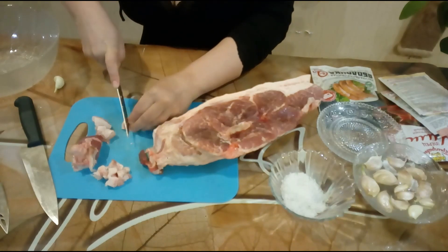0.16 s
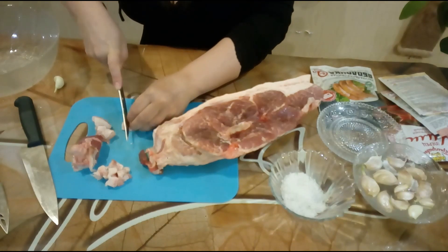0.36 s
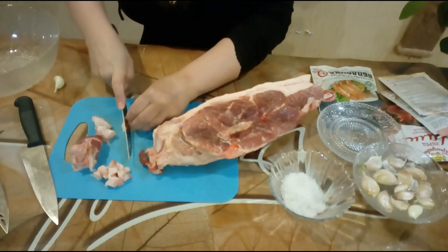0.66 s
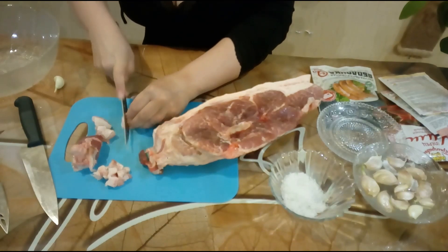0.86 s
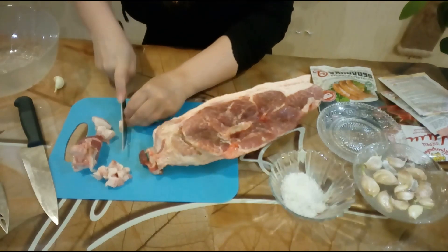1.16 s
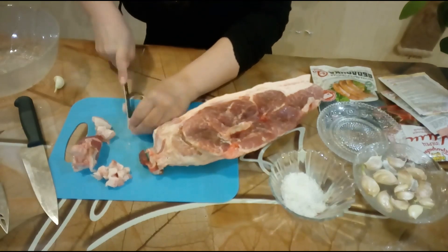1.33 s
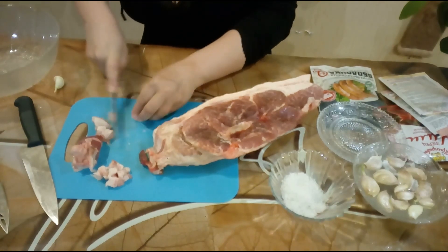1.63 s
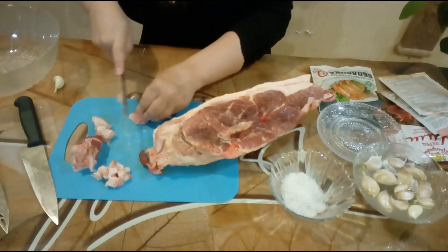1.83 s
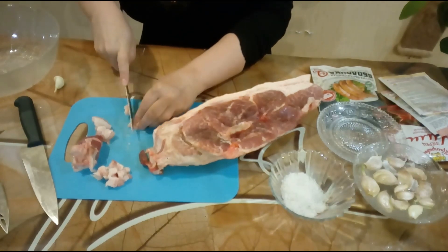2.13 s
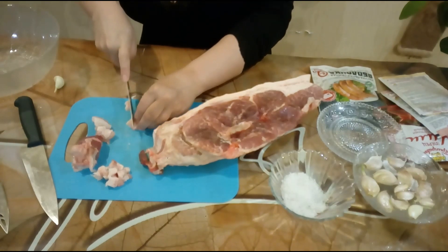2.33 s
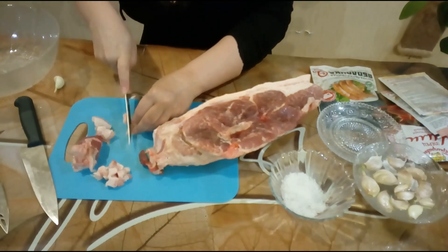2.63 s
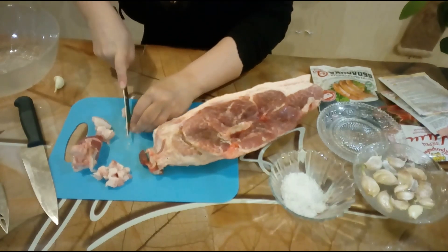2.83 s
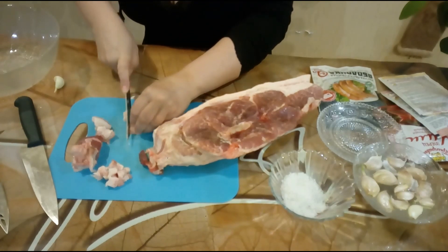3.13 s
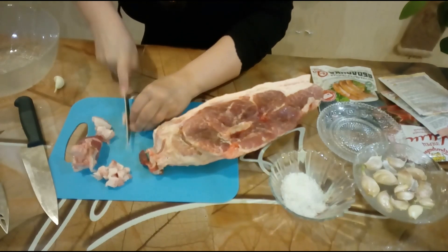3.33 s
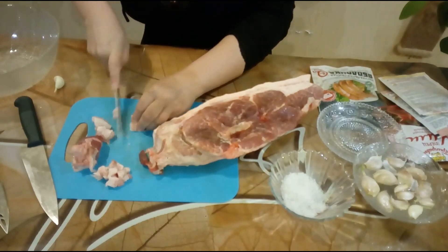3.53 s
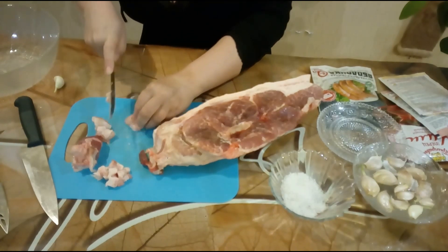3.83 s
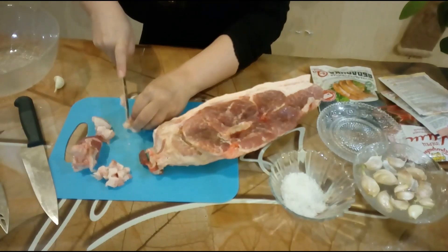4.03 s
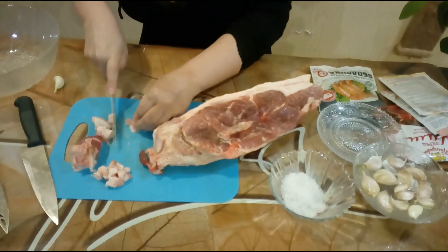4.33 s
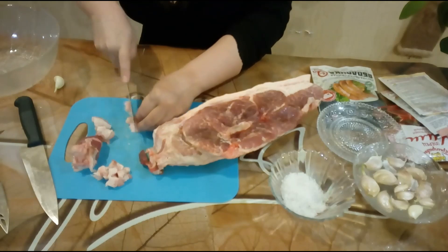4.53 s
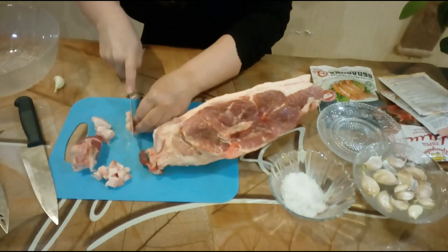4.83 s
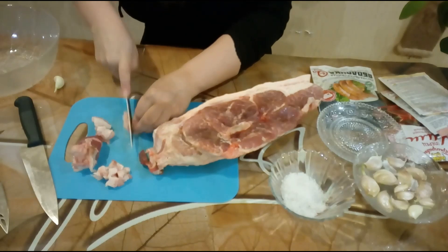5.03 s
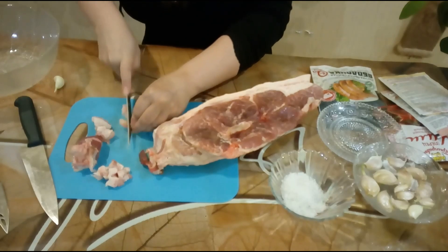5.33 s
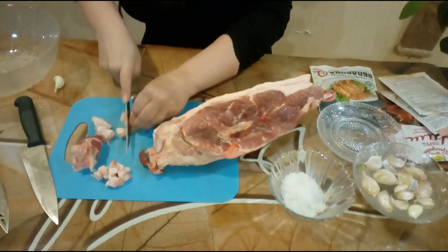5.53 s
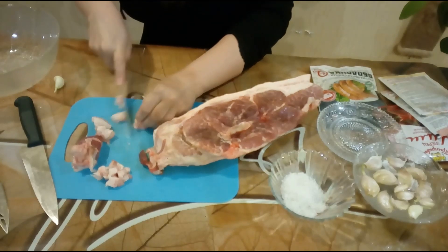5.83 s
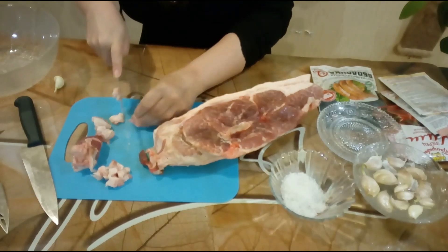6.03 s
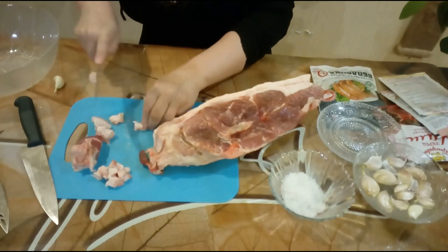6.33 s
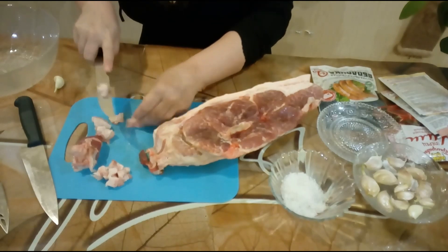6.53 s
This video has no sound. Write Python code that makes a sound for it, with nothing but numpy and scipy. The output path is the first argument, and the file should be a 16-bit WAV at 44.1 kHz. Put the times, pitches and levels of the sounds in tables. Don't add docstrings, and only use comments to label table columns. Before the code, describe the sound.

Close stereo pickup of a knife working on a plastic board on a wooden table. Each short stroke mixes a low table thrum, rubbing board and dry steel rasp, with irregular edge clicks. Three runs are separated by near-quiet, each finishing in a tiny metallic skid. A single loud crack and thud comes before the last run. Soft compressor hum, hiss and brief hard-walled reverberation surround it.

```python
import sys
import numpy as np
from scipy import signal
from scipy.fft import rfft, irfft, next_fast_len
from scipy.io import wavfile
from scipy.ndimage import map_coordinates

SR = 44100
rng = np.random.default_rng(int(sys.argv[2]) if len(sys.argv) > 2 else 0)


def gain_from_decibels(decibels):
    exponent = np.asarray(decibels, float) / 20
    return 10 ** exponent


def bounce(signal):
    frames = np.transpose(np.atleast_2d(signal))
    limited = np.clip(frames, -1, 1)
    pcm = np.round(limited * 32767).astype(np.int16)
    wavfile.write(sys.argv[1], SR, pcm)


N = 293600

LANDING_S = 0.6288

# centre [Hz], width [Hz], level [dB].
BOARD_MODES = [(453.4, 46, -0.5), (578, 17, 3.5), (652.6, 45, 0), (755, 76, -5.5), (893, 95, -7),
               (1189, 54, -5), (1348, 49, -4.5)]
# centre [Hz], width [Hz], level [dB].
EDGE_MODES = [(1606, 396, -2.5), (1800, 197, 3.5), (2107, 110, 4), (2525, 270, -1), (3020, 650, -4.5)]
# centre [Hz], width [Hz], level [dB].
STRUCK_MODES = [(173, 19.6, 3.5), (248, 17.4, 2.5), (330, 27.5, 1), (392, 31, -6.5), (439.5, 48, -5),
                (591, 34, -4.5), (689, 29, -1.5), (1040, 620, -18)]
# frequency [Hz], level [dB per Hz].
SHEEN_SPECTRUM = [(6000, -42), (7500, -8.5), (9500, -5.5), (12000, -17), (14500, -17), (16500, -14)]
# frequency [Hz], left-right likeness [0..1].
NEAR_LIKENESS = [(30, 0.58), (150, 1), (400, .95), (1000, 0.6), (2500, 0.083), (6000, 0.1), (15000, 0.2)]
# frequency [Hz], left minus right [dB].
BOARD_LEAN = [(60, -6.5), (150, -4), (380, -0.5), (950, -4), (2380, 1), (5980, -8), (15000, -5)]


def unit(x):
    return x / np.sqrt(np.mean(x ** 2) + 1e-20)


def along(points, hz):
    f, value = np.transpose(points)
    return np.interp(np.log(hz + 1), np.log(f + 1), value)


def wobble(rate_hz):
    knots = rng.standard_normal(int(N * rate_hz / SR) + 4)
    return map_coordinates(knots, [np.arange(N) * rate_hz / SR])


def filtered(x, response):
    m = next_fast_len(N + SR // 2)
    return irfft(rfft(x, m) * response(np.fft.rfftfreq(m, 1 / SR)), m)[..., :N]


def ringing(x, modes):
    def response(f):
        h = 0
        for k, (centre_hz, width_hz, db) in enumerate(modes):
            damping = 1j * f * width_hz
            h = h + (-1) ** k * gain_from_decibels(db) * damping / (centre_hz ** 2 - f * f + damping)
        low_hz, high_hz = modes[0][0], modes[-1][0]
        h = h * (1j * f / (low_hz + 1j * f)) / (1 + 1j * f / high_hz)
        return h / np.sqrt(np.mean(abs(h) ** 2))
    return filtered(x, response)


def coloured(x, spectrum):
    return filtered(x, lambda f: unit(gain_from_decibels(along(spectrum, f))))


def ports(pair, likeness):
    def mid_side(hz):
        angle = np.arccos(np.clip(along(likeness, hz), -1, 1)) / 2
        return np.array([np.cos(angle), np.sin(angle)])
    mid, side = filtered(pair, mid_side)
    return np.array([mid + side, mid - side])


def leaning(x, points):
    return filtered(x, lambda hz: gain_from_decibels(along(points, hz) / 2 * [[1], [-1]]))


def bursts(times_s, levels_db, t60_s):
    out, t = np.zeros((2, N + 900)), np.arange(900) / SR
    for s, db in zip(times_s, levels_db):
        first = round(s * SR)
        out[:, first:first + len(t)] += gain_from_decibels(db - 60 * t / t60_s) * rng.standard_normal((2, len(t)))
    return out[:, :N]


def slips(rate_hz, spread_db, smooth):
    size = gain_from_decibels(spread_db * rng.uniform(-1, 1, N))
    jerks = (rng.random(N) < rate_hz / SR) * size
    return unit(unit(jerks) + smooth) * rng.standard_normal((2, N))


def background():
    # frequency [Hz], level [dB per Hz].
    air_spectrum = [(12, -34), (25, -22.5), (60, -15.5), (100, -9.5), (160, -9), (240, -14.5), (500, -18),
                    (1000, -25.5), (1900, -22), (3140, -28.5), (4640, -26), (6140, -29.5), (8110, -42),
                    (15900, -41)]
    # frequency [Hz], left-right likeness [0..1].
    air_likeness = [(40, 0.11), (130, 0.15), (300, 0.07), (700, 0.021), (9000, 0.017)]
    # frequency [Hz], left minus right [dB].
    air_lean = [(60, -1), (180, -5.5), (550, -0.5), (1650, 2), (4970, 1.5), (15000, 4.5)]
    # frequency [Hz], level [dB rms].
    hum_lines = [(188, -65.5), (93, -80.5), (330, -85.5), (605, -85.5)]
    noise = ports(rng.standard_normal((2, N)), air_likeness)
    air = gain_from_decibels(-62 + 0.42 * wobble(1)) * coloured(noise, air_spectrum)
    drift_s = np.cumsum(1 + 0.00653 * wobble(7.8)) / SR
    hum = np.zeros(N)
    for hz, db in hum_lines:
        hum += gain_from_decibels(db + 3 + 0.8 * wobble(8)) * np.sin(2 * np.pi * hz * drift_s)
    return leaning(air, air_lean) + hum * gain_from_decibels([[-1.1], [1.1]])


def kitchen(x):
    # frequency [Hz], t60 [s].
    decay = [(100, 0.42), (300, 0.42), (700, 0.45), (2000, 0.4), (5000, 0.3), (9000, 0.16)]
    hz, t, z = signal.stft(rng.standard_normal((2, SR // 2)), SR, nperseg=256)
    tail = signal.istft(z * gain_from_decibels(-60 * t / along(decay, hz)[:, None]), SR, nperseg=256)[1]
    tail = np.pad(tail / np.linalg.norm(tail[0]), ((0, 0), (150, 0)))
    return signal.fftconvolve(x, tail, axes=1)[:, :N]


def touches():
    # time [s], level [dB].
    snaps = [
        (.477, -66),
        (.516, -61),
        (.557, -66),
        (5.031, -57),
    ]
    s, db = np.transpose(snaps)
    pops = coloured(bursts(s, db, t60_s=0.012), SHEEN_SPECTRUM)
    rap = ringing(bursts([LANDING_S], [-34.5], t60_s=0.012), BOARD_MODES[3:] + EDGE_MODES[:3])
    return leaning(ports(pops + rap, NEAR_LIKENESS), BOARD_LEAN)


def knock():
    # time [s], thud [dB], crack [dB].
    blows = [
        (.6288, -26.5, -54),
        (4.492, -41, -41),
        (4.4998, -10, 5.5),
        (4.5068, -42, -24),
        (4.514, -20.5, -41),
    ]
    # frequency [Hz], level [dB per Hz].
    crack_spectrum = [(400, -34), (900, -37), (1300, -10), (2400, -1), (3400, -5), (4500, -3), (6000, -10),
                      (6900, -23), (9000, -34), (16000, -53)]
    s, thud_db, crack_db = np.transpose(blows)
    at = np.round(s * SR).astype(int)
    blow, crack = np.zeros((2, 2, N))
    blow[0, at] = gain_from_decibels(thud_db + 15.5)
    crack[:, at] = -gain_from_decibels(crack_db + np.array([[-4.5], [-8]]))
    chatter = bursts(s, crack_db - 25, t60_s=0.015)
    return ringing(blow, STRUCK_MODES), coloured(crack + chatter, crack_spectrum)


def flicks():
    # time [s], half length [s], skid [dB], blade ring [dB], thud [dB].
    flick_events = [
        (1.752, 0.016, -46.5, -41, -52.5),
        (3.699, 0.016, -39.5, -32.5, -43),
        (3.736, 0.019, -58, -54, -61),
        (5.998, 0.014, -43.5, -39, -49.5),
    ]
    # frequency [Hz], level [dB per Hz].
    skid_spectrum = [(300, -70), (800, 23.5), (1500, 16), (3000, -4), (5500, -11), (7000, 0), (8000, -66),
                     (16000, -57)]
    # centre [Hz], width [Hz], level [dB].
    blade_modes = [(1850, 380, -5.5), (2580, 340, 1.5), (3010, 620, -3), (4630, 700, -7.5)]
    s, half_s, *levels_db = np.transpose(flick_events)
    swell = np.exp(-((np.arange(N) / SR - s[:, None]) / half_s[:, None]) ** 4)
    skid, ring, thud = gain_from_decibels(levels_db) @ swell
    grit = slips(rate_hz=4000, spread_db=4, smooth=1.2)
    sung = ringing(grit * ring, blade_modes)
    return coloured(grit * skid, skid_spectrum) + sung + ringing(grit * thud, STRUCK_MODES[4:])


def ticks():
    # time [s], peak [dB], low body over peak [dB], knock over peak [dB].
    catches = [(0.5142, -63, 1, -10), (0.5569, -49, 22, 1), (0.6298, -55, 4, 7), (0.7027, -46, 14, 16),
               (0.7381, -36, 0, -14), (0.8784, -41.5, -8, -6), (0.9153, -42, 10, 1), (0.9614, -54, 14, -4),
               (1.043, -33, -28, 5.5), (1.1676, -38, 5, 4), (2.963, -43, -6, -29), (3.113, -40, 19, -20),
               (3.4988, -48, 15, 4), (4.4197, -54, -6, -15), (4.788, -58, -25, 2), (4.9704, -67, 16, -16),
               (5.0322, -53, 13, 7), (5.0527, -45, -7, 8), (5.1921, -31.5, -3, -11),
               (5.2322, -37.5, 22, -1), (5.3195, -33, -29, -4), (5.3356, -33, 20, 4), (5.4872, -41, 2, -9),
               (5.5243, -36, -16, -25), (5.75, -37, -9, -8)]
    # frequency [Hz], level [dB per Hz].
    click_spectrum = [(470, -41), (800, 9), (2940, -6), (3400, -5), (3990, 4.5), (4680, -14), (5490, -7),
                      (9530, -31), (15000, -52)]
    # centre [Hz], width [Hz], level [dB].
    steel_modes = [(1960, 1600, -13.5), (2820, 300, 4), (4090, 210, 0.5), (5360, 220, -1), (7200, 160, -11),
                   (9250, 320, -22)]
    s, db, body_db, knock_db = np.transpose(catches)
    contact = bursts(s, db - 4, t60_s=0.013)
    click = gain_from_decibels(1) * coloured(contact, click_spectrum) + gain_from_decibels(3.5) * ringing(contact, steel_modes)
    body = ringing(bursts(s, db + body_db - 5, t60_s=0.0015), STRUCK_MODES[:4])
    return click + body + ringing(bursts(s, db + knock_db - 3, t60_s=0.028), BOARD_MODES)


def strokes(levels_db, start_s, hold_s, rise_s, fall_s):
    grid_s = np.arange(0, N, 22) / SR
    landed = abs(start_s - LANDING_S) < 0.03
    t = grid_s - np.where(landed, LANDING_S, start_s)[:, None]
    rise_s = np.where(landed, 0.002, rise_s)[:, None]
    rise_db = -20 * np.maximum(-t / rise_s, 0)
    fall_db = -20 * np.maximum((t - hold_s[:, None]) / fall_s, 0)
    shape = gain_from_decibels(np.maximum(rise_db + fall_db, -150))
    return [np.interp(np.arange(N) / SR, grid_s, gain) for gain in gain_from_decibels(levels_db) @ shape]


def sawing():
    # start [s], hold [s], thrum [dB], rub over thrum [dB],
    # deep shake over thrum [dB].
    presses = [(0.556, 0.026, -47.5, -6, -6), (0.616, 0.058, -38.5, -8, -1), (0.718, 0.1, -35.5, -7, -1.5),
               (0.913, 0.054, -37, -3.5, 3.5), (1.047, 0.046, -32.5, -7, -9), (1.169, 0.08, -36.5, -1, 3),
               (1.314, 0.048, -40, -4.5, -11), (1.455, 0.057, -38.5, 1, -1.5),
               (1.606, 0.091, -41, -2, -7.5), (2.797, 0.039, -51.5, -5, -0.5),
               (2.959, 0.073, -59.5, -1, 3.5), (3.11, 0.055, -38.5, -5, -7), (3.214, 0.15, -55.5, 5.5, -9),
               (3.342, 0.11, -55.5, 7, -4), (3.491, 0.03, -37.5, -5.5, -16.5), (3.55, 0.064, -45, -0.5, -2),
               (5.06, 0.08, -43.5, -3.5, 0.5), (5.208, 0.044, -44.5, -2, 7),
               (5.334, 0.078, -38.5, -2, -5.5), (5.496, 0.038, -34, -3, -0.5),
               (5.626, 0.051, -44.5, 0.5, -4), (5.774, 0.074, -43, 1.5, -4), (5.861, 0.046, -52.5, -4, 2)]
    # start [s], hold [s], rasp [dB], brightness [dB].
    slides = [(0.546, 0.043, -60.5, -1), (0.623, 0.079, -56, 0), (0.735, 0.051, -42, -1),
              (0.906, 0.041, -46, -1), (1.041, 0.042, -40.5, 0.5), (1.165, 0.06, -42.5, 2),
              (1.299, 0.058, -47, 2), (1.449, 0.046, -38.5, -1.5), (1.578, 0.097, -47, -1),
              (2.784, 0.068, -61.5, 7.5), (2.954, 0.015, -58, 5.5), (3.108, 0.035, -49, 6),
              (3.209, 0.096, -51.5, 0.5), (3.344, 0.085, -48.5, -1.5), (3.48, 0.06, -55.5, -2),
              (3.531, 0.069, -47, 1), (5.055, 0.061, -51, 4), (5.196, 0.046, -49.5, -2),
              (5.328, 0.058, -43, 3.5), (5.486, 0.041, -42, -1), (5.623, 0.055, -47.5, 0),
              (5.758, 0.12, -45.5, 0), (5.865, 0.055, -58.5, 1)]
    # centre [Hz], width [Hz], level [dB].
    thrum_modes = [(243.4, 8.8, -9.5), (334.5, 23.2, -1.5), (397.2, 5.5, -12)]
    # frequency [Hz], level [dB per Hz].
    shake_spectrum = [(15, -39), (30, -25), (80, -17), (125, -12.5), (165, -0.5), (205, 0.5), (240, -11.5),
                      (320, -61.5)]
    # centre [Hz], width [Hz], level [dB].
    hiss_modes = [(3980, 330, 4), (4830, 605, 0), (5310, 395, 1), (6220, 1140, -8.5), (7970, 2300, -28)]
    s, hold_s, db, rub_db, shake_db = np.transpose(presses)
    levels_db = [db - 1, db + rub_db - 0.5, db + shake_db - 1]
    thrum_gain, rub_gain, shake_gain = strokes(levels_db, s + 0.014, 0.52 * hold_s, 0.048, 0.04)
    s, hold_s, db, bright_db = np.transpose(slides)
    levels_db = [db + 0.5, db - 5.5 + bright_db, db - 25.5 + 1.6 * bright_db]
    rasp_gain, hiss_gain, sheen_gain = strokes(levels_db, s + 0.014, 0.53 * hold_s, 0.046, 0.047)

    drag = slips(rate_hz=1200, spread_db=6, smooth=1) * gain_from_decibels(1.5 * wobble(70))
    swapped = drag[::-1]

    def grip():
        return gain_from_decibels(2.2 * wobble(45))

    thrum = ringing(drag * grip() * thrum_gain, thrum_modes)
    rub = ringing(swapped * grip() * rub_gain, BOARD_MODES)
    shake = coloured(swapped * shake_gain, shake_spectrum)
    rasp = ringing(drag * grip() * rasp_gain, EDGE_MODES)
    hiss = ringing(swapped * grip() * hiss_gain, hiss_modes)
    sheen = coloured(drag * sheen_gain, SHEEN_SPECTRUM)
    return thrum + rub + shake + rasp + hiss + sheen


def scene():
    # frequency [Hz], left-right likeness [0..1].
    room_likeness = [(60, 1), (150, 0.89), (380, 0.94), (950, 0.14), (2380, 0.08), (5980, 0.029),
                     (15000, 0.053)]
    saw, flick = sawing() + ticks(), flicks()
    thud, crack = knock()
    wet = kitchen(gain_from_decibels(-7) * (saw + flick))
    wet = wet + kitchen(gain_from_decibels(-1) * thud[:1] + gain_from_decibels(-5) * crack[:1])
    near = ports(saw + flick + thud + crack, NEAR_LIKENESS)
    return leaning(near + ports(wet, room_likeness), BOARD_LEAN) + background() + touches()


def top_cut(x):
    return signal.sosfilt(signal.butter(12, 16010, fs=SR, output="sos"), x)


def record(dry):
    mix = filtered(dry, lambda hz: hz < 15750)
    return top_cut(mix)


dry = scene()
out = record(dry)
bounce(out)
```